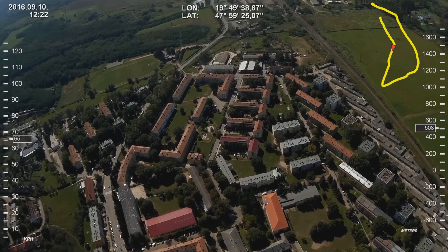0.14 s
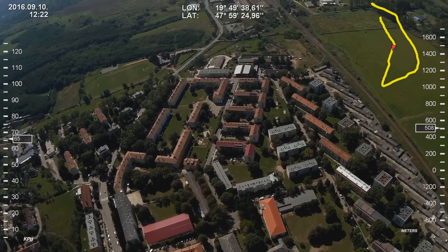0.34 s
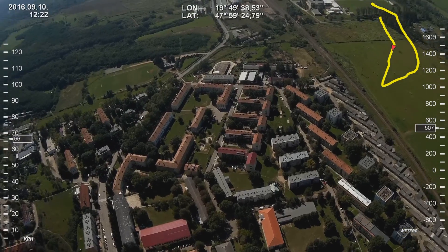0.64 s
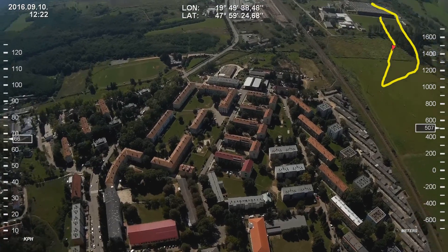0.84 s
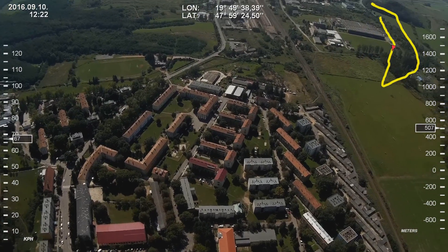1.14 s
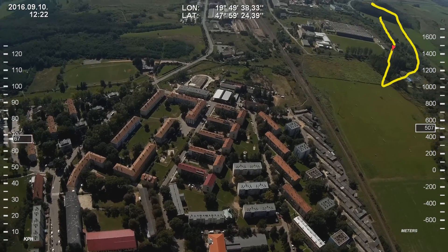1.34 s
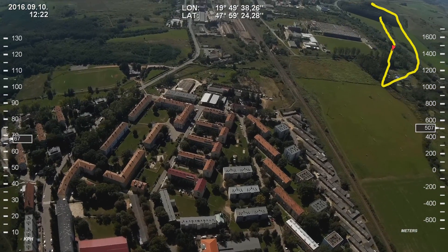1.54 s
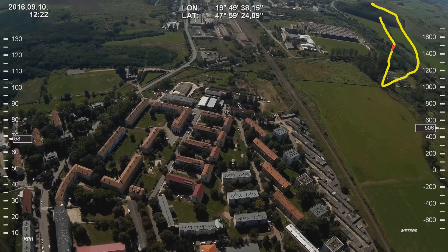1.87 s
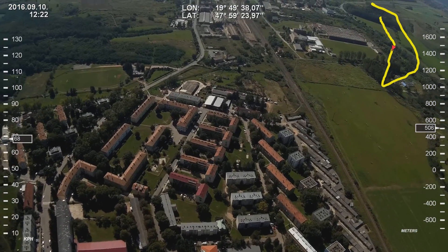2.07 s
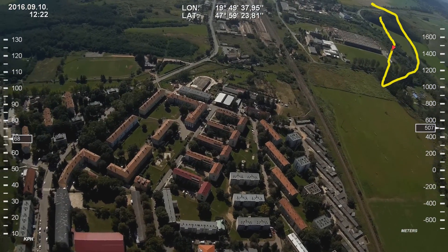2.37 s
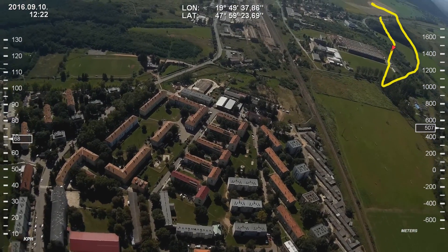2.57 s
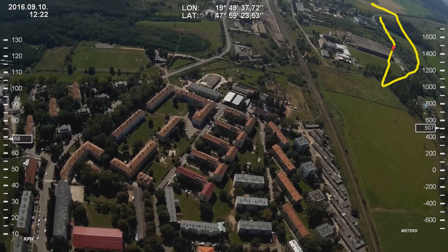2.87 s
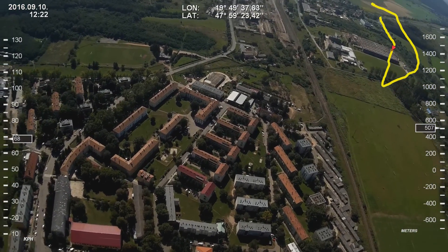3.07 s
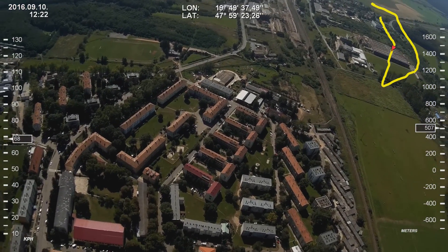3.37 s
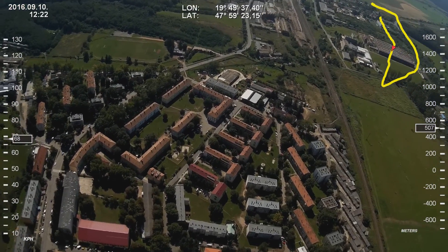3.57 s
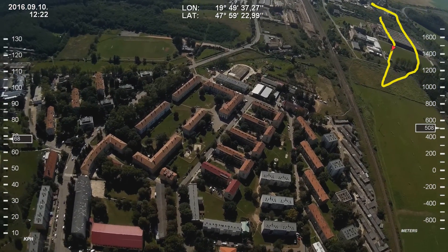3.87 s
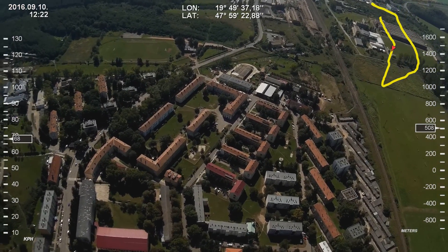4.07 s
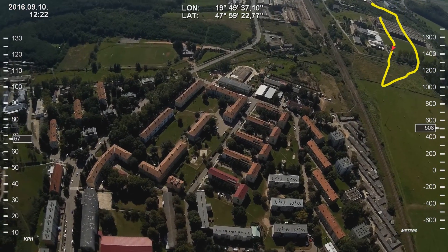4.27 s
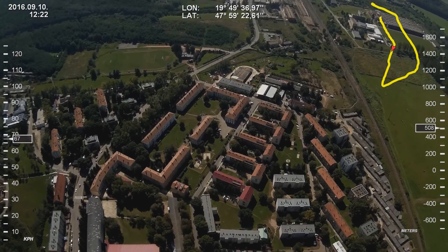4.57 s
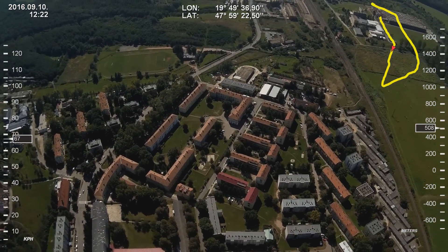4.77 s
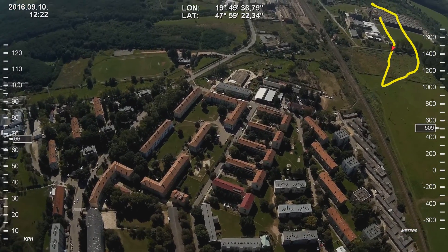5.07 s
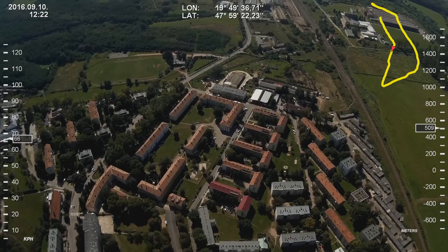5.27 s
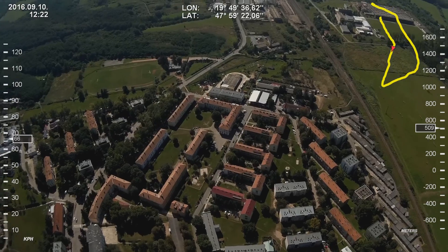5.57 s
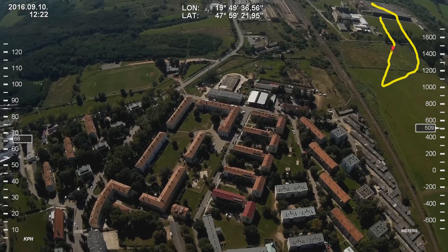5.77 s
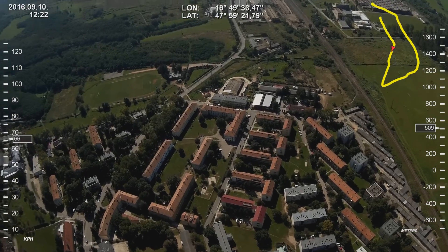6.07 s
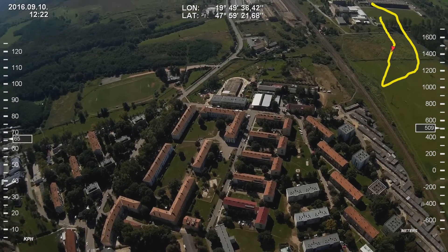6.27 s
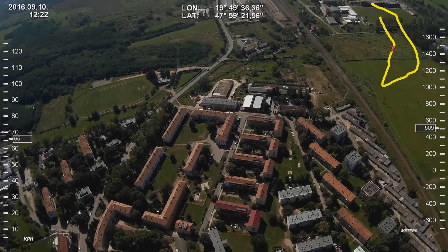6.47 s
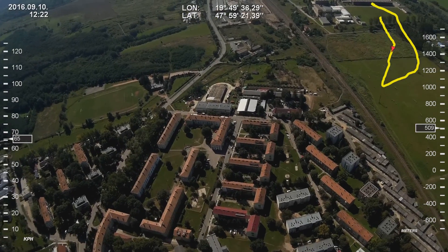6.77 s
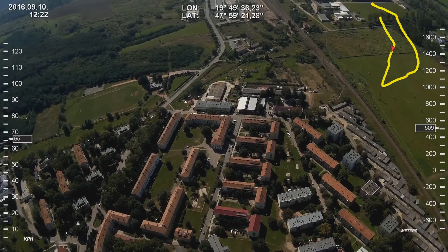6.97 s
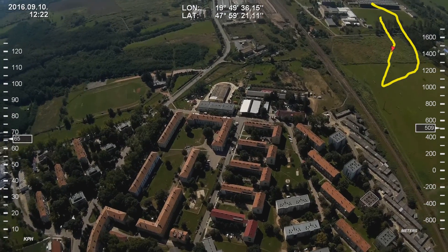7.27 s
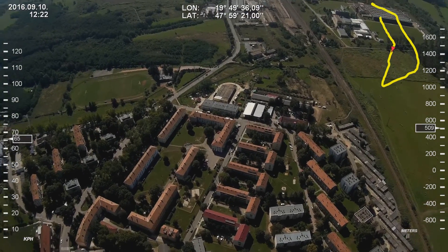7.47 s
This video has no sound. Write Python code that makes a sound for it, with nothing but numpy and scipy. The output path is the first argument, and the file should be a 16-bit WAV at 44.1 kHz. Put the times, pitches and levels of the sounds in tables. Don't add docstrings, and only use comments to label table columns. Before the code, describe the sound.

The sound starts already in flight and runs without pause for about 7.6 seconds. A two-blade propeller thrums very close, a buzzing hum near 300 Hz, under a prominent, piercing electric whine of two close tones around 2 kHz that throb roughly together. Thin controller whistles drift around them, with a faint steady high tone. Wind rumbles, roars and hisses over the microphone, swelling near 0.5 s and easing by 1.5 s, then picking up again from 2 to 3 s. The motor pitch slips down early and again around 2 to 3 s, then holds with small wavers; near 5 s it locks briefly steady. The wind thins gradually until 6.8 s, when a gust abruptly returns and roughens the blade buzz as the motor settles lower towards 7.4 s. It ends still flying, close and dry, with slightly gritty, patchy treble.

```python
import sys
import numpy as np
from scipy import signal
from scipy.fft import rfft, irfft, next_fast_len
from scipy.io import wavfile

SR = 44100
rng = np.random.default_rng(int(sys.argv[2]) if len(sys.argv) > 2 else 0)


def elevation(decibels):
    levels = np.asarray(decibels, float)
    return 10 ** (levels / 20)


def pcm_store(signal):
    levels = np.round(np.clip(np.atleast_2d(signal), -1, 1) * 32767)
    wavfile.write(sys.argv[1], SR, levels.astype(np.int16).T)


N = 336483

# (time [s], speed [turns/s])
SHAFT_SPEED = [(0.0, 154.56), (0.14, 154.42), (0.74, 150.51), (1.04, 150.85), (1.58, 149.99), (2.5, 144.07),
               (3.06, 142.21), (3.16, 143.17), (3.44, 142.19), (3.7, 142.55), (3.86, 143.74), (4.7, 143.85),
               (4.84, 142.91), (5.72, 142.81), (5.86, 141.82), (6.46, 141.95), (7.4, 137.17),
               (7.63, 137.52)]
# (time [s], roar level [dB])
GUSTS = [(0.0, -28.5), (0.45, -23.5), (0.8, -26), (1.4, -31.5), (1.48, -32), (1.52, -28.5), (2.0, -28.5),
         (2.05, -27), (2.8, -26.5), (3.45, -29.5), (3.5, -30.5), (4.4, -31.5), (5.6, -32.5), (6.8, -35),
         (6.84, -27.5), (7.1, -26), (7.4, -27.5), (7.63, -26.5)]

# (frequency [Hz], rms level [dB])
BLADE_TONE = [(274, -24.5), (282, -20), (287, -19), (293, -20), (302, -18.5), (309, -20.5)]
# (multiple of shaft speed, rms level [dB])
SHAFT_HARMONICS = [(1, -31), (5, -44), (6, -33), (8, -37), (10, -40), (11, -41), (12, -33), (15, -46),
                   (16, -38), (18, -37.5), (20, -39.5), (21, -46), (22, -43), (24, -45), (26, -50),
                   (28, -50)]
# (frequency [Hz], gain [dB])
BODY_RESPONSE = [(100, -3), (145, 1), (155, -6.5), (850, 0), (910, 2.5), (1150, 0.5), (1600, -2),
                 (1720, 3.5), (1850, -6.5), (2300, 1.5), (2450, -1.5), (2700, 0.5), (3100, -1.5), (3500, 1)]
# (frequency [Hz], rms level [dB])
MOTOR_MOUNT = [(1785, -14.3), (1825, -19.5), (1870, -19), (1920, -23), (1960, -27.5), (2030, -28.5),
               (2090, -22), (2160, -19.5)]

# (frequency [Hz], rms level [dB])
COMMUTATION_TONE = [(5780, -58), (5950, -53), (6050, -53), (6150, -58), (6330, -68)]
# (frequency [Hz], rms level [dB])
BEAT = [(1510, -34.5), (1650, -28), (1800, -29), (1900, -40), (1950, -42), (2000, -34), (2050, -28),
        (2220, -35.5)]
# (frequency [Hz], rms level [dB])
BEAT_OCTAVE = [(3250, -51), (3400, -45), (3650, -49.5), (3800, -54.5), (4050, -50), (4300, -60.5)]
# (frequency [Hz], rms level [dB])
DOUBLE_BEAT = [(3540, -31), (3680, -36.5), (3800, -43.5), (3970, -42.5), (4090, -44.5), (4330, -50),
               (4650, -54), (4960, -55.5)]
# (frequency [Hz], rms level [dB])
TRIPLE_BEAT = [(1900, -56), (2050, -46), (2140, -38), (2250, -52)]
# (multiple of shaft speed, rms level [dB])
SWITCH_BEATS = [(14, -58), (21, -68.5), (28, -56)]

# (frequency [Hz], density [dB per Hz])
RUMBLE_SPECTRUM = [(20, -7.5), (45, 1.5), (80, 3), (150, 5), (230, -0.5), (400, -5.5), (1000, -15),
                   (1900, -2.5), (2600, -11.5), (3600, -14), (4500, -37), (6200, -40.5), (9000, -56.5)]
# (frequency [Hz], density [dB per Hz])
ROAR_SPECTRUM = [(150, -4.5), (300, 2), (500, 2.5), (750, 3), (1200, -0.5), (1700, -2.5), (2500, -31.5),
                 (4000, -39.5)]
# (frequency [Hz], density [dB per Hz])
HISS_SPECTRUM = [(800, -22), (1500, 8), (2200, 11.5), (2800, 12), (3600, 7.5), (4300, 1.5), (5800, -5),
                 (7000, -10.5), (8000, -13), (9300, -19.5), (10500, -24.5)]

# (lower edge [Hz], threshold [dB], step [dB])
STARVED_BANDS = [(6200, -40.5, -43), (6890, -39.5, -41), (7580, -60, -25), (8270, -37, -42),
                 (8960, -42.5, -43), (9650, -41.5, -44)]

CRUISE_GUST_DB, CRUISE_SHAFT_HZ = -30, 145
HISS_DB, HISS_FOLLOWS, HISS_DB_PER_HZ = -44, 0.75, 0.16
OVERTONE_DB, OVERTONE_FOLLOWS, OVERTONE_DB_PER_HZ = -30, 0.88, 0.28
BLADE_FOLLOWS = 0.3
ORDER14_DB = -0.37
COMMUTATIONS = 42
SWITCH_HZ, SWITCH_DB = 7992.3, -42
LOCK_START_S, LOCK_END_S, LOCK_RATIO, LOCK_GAIN_DB = 4.98, 5.27, 56, 2.5
RUMBLE_DB, SIZZLE_HZ = -25, 8600
FRAME, FRAME_START = 1024, 492
BUDGET_SWING_DB = 2.2


def rms_one(x):
    return x / np.sqrt(np.mean(x ** 2) + 1e-20)


def in_time(rows):
    s, value = np.transpose(rows)
    return np.interp(np.arange(N) / SR, s, value)


def at_hz(points, hz):
    point_hz, point_db = np.transpose(points)
    return np.interp(np.log(hz), np.log(point_hz), point_db)


def drift(rate):
    r = np.exp(-80 * np.pi * rate / SR)
    draws = rng.standard_normal(N // 40 + 2002)
    slow = signal.lfilter([1], [1, -2 * r, r * r], draws)[2000:]
    return np.interp(np.arange(N) / 40, np.arange(len(slow)), rms_one(slow))


def tone(angle, level_db):
    return np.sqrt(2) * elevation(level_db) * np.cos(angle)


def air(spectrum, patchy_db, per_s):
    size = next_fast_len(N)
    hz = np.maximum(np.arange(size // 2 + 1) * SR / size, 1)
    white = rfft(rng.standard_normal(size))
    coloured = white * elevation(at_hz(spectrum, hz)) * np.sqrt(SR / 2000)
    coloured[hz < spectrum[0][0] / 2] = 0
    octave = np.log2(hz / 20)
    together = drift(per_s)
    out = 0
    for k in range(10):
        band = irfft(coloured * np.clip(1 - abs(octave - k), 0, 1), size)[:N]
        out = out + band * elevation(patchy_db * (0.5 * together + drift(per_s)))
    return out


def propeller(turn, shaft_hz, blade_db, overtone_db):
    out = tone(2 * turn, blade_db + 0.31 * drift(9))
    out += tone(4 * turn + 0.5, overtone_db + 0.69 * drift(6.5))
    for multiple, level_db in SHAFT_HARMONICS:
        wobble = 0.31 * drift(3.5)
        passed_db = level_db + at_hz(BODY_RESPONSE, multiple * shaft_hz)
        out += tone(multiple * turn + wobble, passed_db + 0.8 * drift(3.6))
    return out


def motor(turn, order13_db, order14_db):
    lower = tone(13 * turn, order13_db + 0.14 * drift(12))
    upper = tone(14 * turn + 0.35, order14_db + 0.33 * drift(3.5))
    return lower + upper


def controller(turn, shaft_hz, beat_db, double_db):
    switch = 2 * np.pi * SWITCH_HZ * np.arange(N) / SR
    step = COMMUTATIONS * turn + 0.2 * drift(24)
    step_hz = COMMUTATIONS * shaft_hz
    out = tone(switch, SWITCH_DB + 1.1 * drift(35))
    out += tone(step, at_hz(COMMUTATION_TONE, step_hz) + 1.8 * drift(9))
    out += tone(switch - step, beat_db + 1.3 * drift(3.6))
    out += tone(2 * step - switch, double_db + 1.7 * drift(1.6))
    out += tone(3 * step - 2 * switch, at_hz(TRIPLE_BEAT, 3 * step_hz - 2 * SWITCH_HZ))
    out += tone(2 * (switch - step), at_hz(BEAT_OCTAVE, 2 * (SWITCH_HZ - step_hz)))
    for multiple, level_db in SWITCH_BEATS:
        out += tone(switch - multiple * turn, level_db + 0.7 * drift(6))
    return out


def slipstream(turn, shaft_hz, hiss_db, roar_db):
    rumble = elevation(RUMBLE_DB) * rms_one(air(RUMBLE_SPECTRUM, patchy_db=1.0, per_s=6.7))
    roar = elevation(roar_db + 3.0) * air(ROAR_SPECTRUM, patchy_db=1.5, per_s=16)
    chop = 1 + 0.15 * np.cos(2 * turn)
    flutter = elevation(hiss_db - 2.0 + 2.0 * drift(50))
    hiss = flutter * chop * air(HISS_SPECTRUM, patchy_db=-0.5, per_s=18)
    high_pass = signal.butter(6, SIZZLE_HZ, "high", fs=SR, output="sos")
    top = signal.sosfiltfilt(high_pass, hiss)
    sizzle = (elevation(0.9 * (shaft_hz - 147.5)) - 1) * top
    return rumble + roar + hiss + sizzle


def scene():
    shaft_hz, roar_db = in_time(SHAFT_SPEED), in_time(GUSTS)
    locked = slice(int(LOCK_START_S * SR), int(LOCK_END_S * SR))
    shaft_hz[locked] = SWITCH_HZ / LOCK_RATIO
    turn = 2 * np.pi * np.cumsum(shaft_hz) / SR + 0.7
    gust_db = roar_db - CRUISE_GUST_DB
    faster_hz = shaft_hz - CRUISE_SHAFT_HZ
    step_hz = COMMUTATIONS * shaft_hz

    blade_db = at_hz(BLADE_TONE, 2 * shaft_hz) + BLADE_FOLLOWS * gust_db
    overtone_db = OVERTONE_DB + OVERTONE_FOLLOWS * gust_db + OVERTONE_DB_PER_HZ * faster_hz
    order13_db = at_hz(MOTOR_MOUNT, 13 * shaft_hz)
    order14_db = at_hz(MOTOR_MOUNT, 14 * shaft_hz) + ORDER14_DB
    beat_db = at_hz(BEAT, SWITCH_HZ - step_hz)
    double_db = at_hz(DOUBLE_BEAT, 2 * step_hz - SWITCH_HZ)
    double_db[locked] += LOCK_GAIN_DB
    hiss_db = HISS_DB + HISS_FOLLOWS * gust_db + HISS_DB_PER_HZ * faster_hz

    mix = propeller(turn, shaft_hz, blade_db, overtone_db)
    mix += motor(turn, order13_db, order14_db)
    mix += controller(turn, shaft_hz, beat_db, double_db)
    mix += slipstream(turn, shaft_hz, hiss_db, roar_db)
    return mix[None]


def starve_treble(x):
    n = np.arange(2 * FRAME)
    k = np.arange(round(STARVED_BANDS[0][0] * 2 * FRAME / SR), FRAME // 2)
    taper = signal.windows.kaiser_bessel_derived(2 * FRAME, 4 * np.pi)
    cosines = np.cos(np.pi / FRAME * np.outer(k + 0.5, n + 0.5 + FRAME / 2))
    basis = taper * np.sqrt(2 / FRAME) * cosines
    lead = 2 * FRAME - FRAME_START
    halves = np.pad(x, (lead, 2 * FRAME - (lead + N) % FRAME)).reshape(-1, FRAME)
    lines = np.hstack([halves[:-1], halves[1:]]) @ basis.T
    edges_hz = [row[0] for row in STARVED_BANDS]
    band = np.searchsorted(edges_hz, (k + 0.5) * SR / (2 * FRAME)).clip(1) - 1
    swing_db = BUDGET_SWING_DB * rng.standard_normal((len(lines), 1))
    lost = lines.copy()
    for b, (_, threshold_db, step_db) in enumerate(STARVED_BANDS):
        part = lines[:, band == b]
        level = np.sqrt(np.mean(part ** 2, axis=1, keepdims=True))
        strong = level > elevation(threshold_db + swing_db)
        lost[:, band == b] -= strong * np.round(part / elevation(step_db)) * elevation(step_db)
    frames = lost @ basis
    halves[:-1] -= frames[:, :FRAME]
    halves[1:] -= frames[:, FRAME:]
    return halves.ravel()[lead:lead + N]


def top_cut(x):
    return signal.sosfilt(signal.butter(12, 10380, fs=SR, output="sos"), x)


def record(dry):
    rounded = 0.87 * np.tanh(dry[0] / 0.85) * elevation(0.82)
    mix = starve_treble(rounded - rounded.mean())[None]
    return top_cut(mix)


dry = scene()
out = record(dry)
pcm_store(out)
```